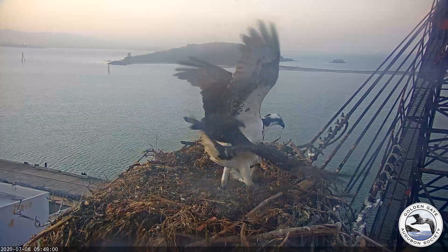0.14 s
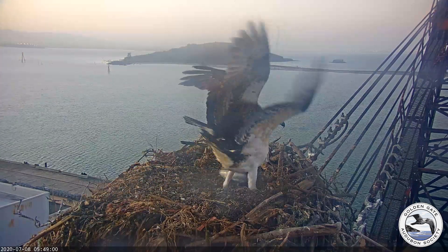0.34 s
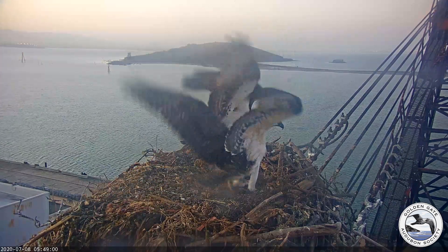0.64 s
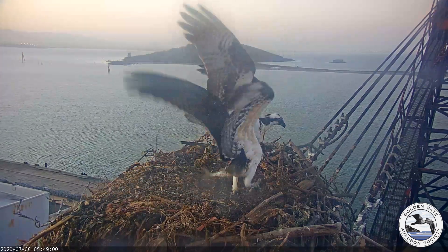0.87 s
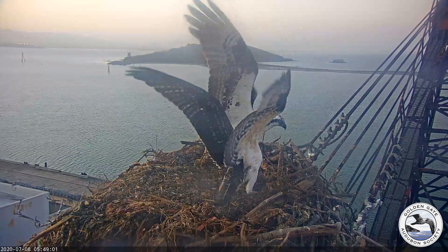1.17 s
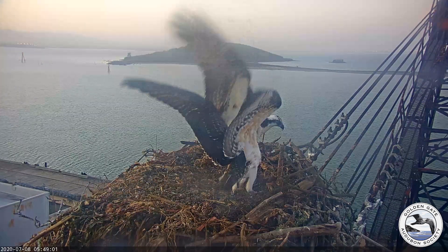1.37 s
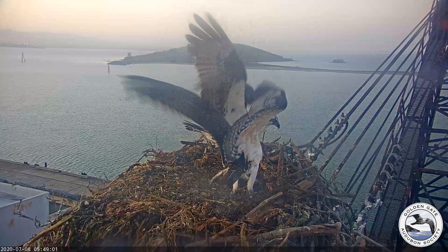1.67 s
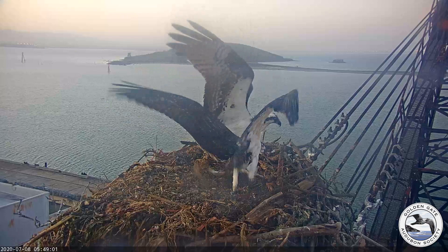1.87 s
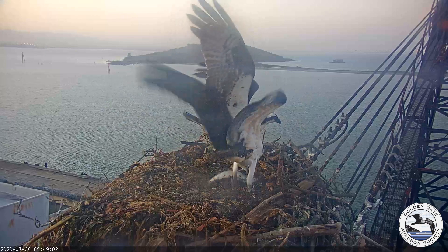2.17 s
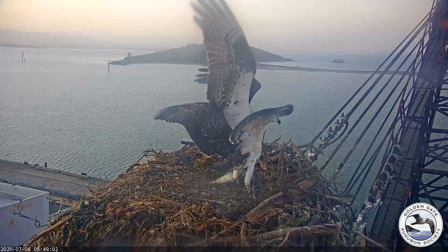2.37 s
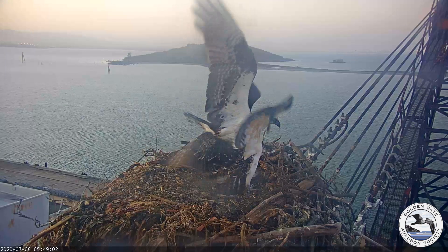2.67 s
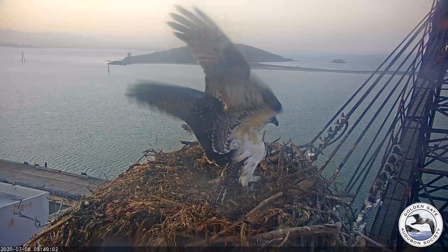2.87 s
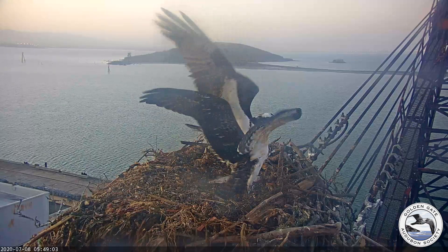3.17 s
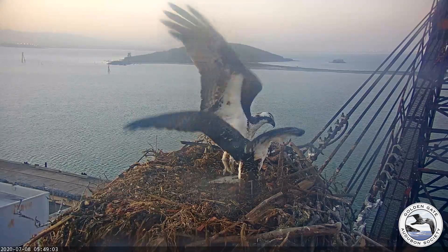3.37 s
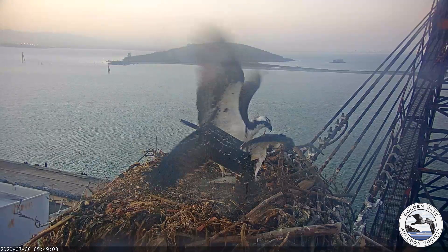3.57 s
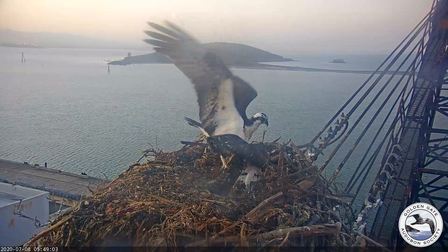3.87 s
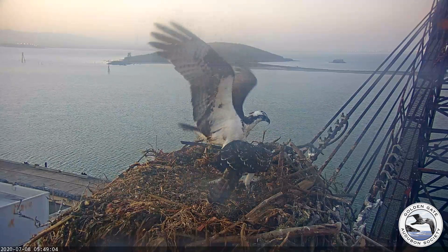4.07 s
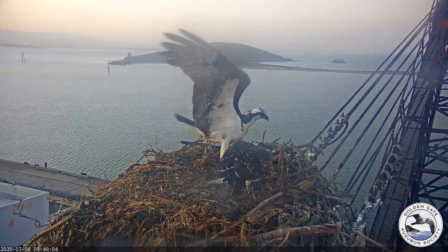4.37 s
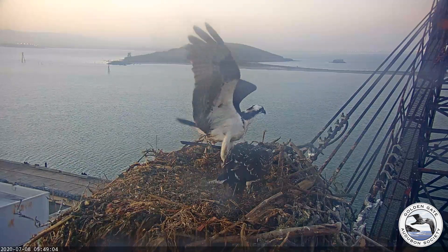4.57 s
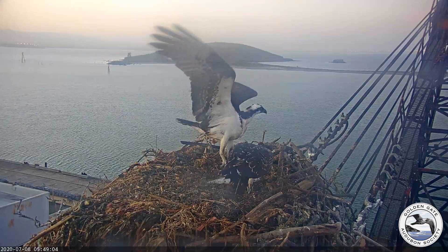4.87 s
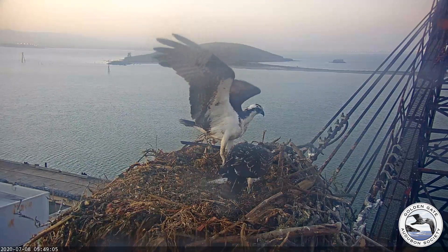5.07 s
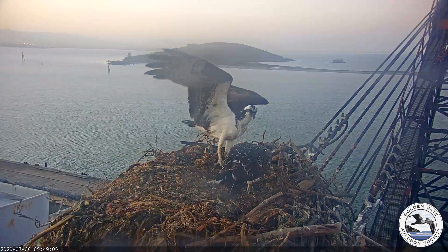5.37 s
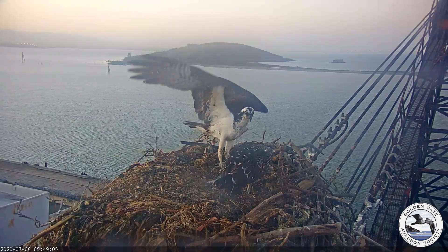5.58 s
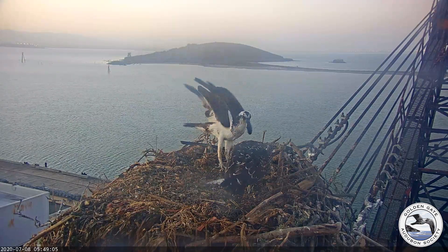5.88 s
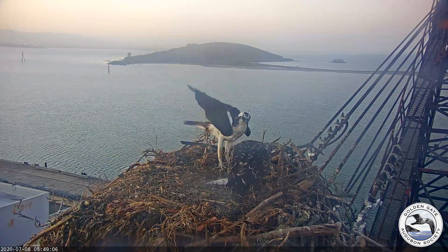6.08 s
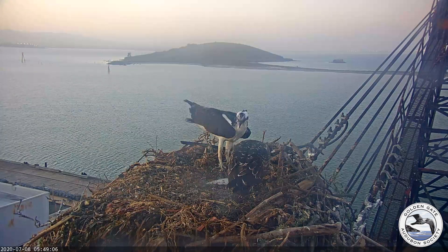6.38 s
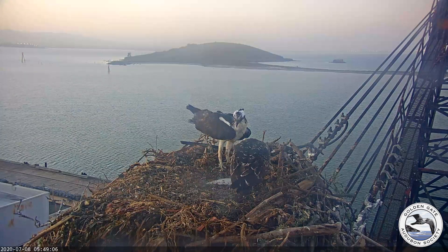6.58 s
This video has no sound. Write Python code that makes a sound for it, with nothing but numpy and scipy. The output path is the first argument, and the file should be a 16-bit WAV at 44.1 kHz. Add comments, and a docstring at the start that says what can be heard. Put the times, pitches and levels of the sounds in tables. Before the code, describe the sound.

Outdoors by the water, large birds call over a low, steady wash. First come separate piercing whistles, some drooping at the end, with brief voice cracks between them. They stop for about a second, then loud chirps rattle out about six per second, each rising, breaking higher and dropping back. Distant gulls cry very faintly. Close, slightly overloaded sound with quick light reflections and a thin tail.

```python
"""Shore wash runs throughout; ospreys on a nest begin with squeaks, faint scoops and drawn-out begging whistles.
Far gulls, plain pitch arches, cry from 0.4 s. From 3.3 s a fast run of chirps joins the last whistles:
each climbs on the low side of the syrinx, breaks to the high side and drops back; a last squeak follows.
Voices are trembling near sines with air noise and reflections. The microphone clips loud notes unevenly,
which adds their octave and low difference tones."""
import sys
import numpy as np
from scipy import signal
from scipy.fft import rfft, irfft, next_fast_len
from scipy.io import wavfile
from scipy.ndimage import uniform_filter1d, map_coordinates

SR = 44100
rng = np.random.default_rng(int(sys.argv[2]) if len(sys.argv) > 2 else 0)


def waveform_to_disk(signal):
    """Save audio, clipped to [-1, 1], as 16-bit WAV at the path in sys.argv[1]."""
    frames = np.transpose(np.atleast_2d(signal))
    scaled = np.clip(frames, -1, 1) * 32767
    samples = np.round(scaled).astype(np.int16)
    wavfile.write(sys.argv[1], SR, samples)


N = 296793


def from_db(db):
    """Decibels to gain."""
    return 10 ** (np.asarray(db) / 20)


def unit(x):
    """Scales to rms 1."""
    return x / np.sqrt(np.mean(x ** 2) + 1e-20)


def colour(x, points):
    """Filters by a spectrum of (Hz, dB) points, interpolated over log frequency."""
    hz, db = np.transpose(points)
    size = next_fast_len(len(x) + 4096)
    f = np.fft.rfftfreq(size, 1 / SR)
    gain = from_db(np.interp(np.log(f + 1), np.log(hz), db))
    return irfft(rfft(x, size) * gain, size)[:len(x)]


def waver(count, rate_hz):
    """Smooth random motion of about rms 1, up to about rate_hz."""
    at = np.arange(count) * 2 * rate_hz / SR
    knots = rng.standard_normal(int(at[-1]) + 4)
    return map_coordinates(knots, [at + 1], order=3, mode="nearest")


def add(mix, s, sound):
    """Mixes a sound in at time s."""
    part = mix[max(round(s * SR), 0):][:len(sound)]
    part += sound[:len(part)]


def parabola(u, first, middle, last):
    """A smooth arch through three values as u goes from 0 to 1."""
    return np.polyval(np.polyfit([0, .5, 1], [first, middle, last], 2), u)


def clock(length_s):
    """Time since the start of a note, and the same as a share of its length."""
    t = np.arange(max(round(length_s * SR), 64)) / SR
    return t, t / t[-1]


# shore wash and microphone hiss, spectrum shape: (frequency [Hz], relative density [dB])
WASH_SPECTRUM = [(30, -8), (750, -7.5), (1020, 4.5), (1300, -8.5), (1750, -21.5), (2500, 1.5),
                 (4200, -20.5), (5500, -30), (7000, -37)]
WASH_DB = -52.5


def wash():
    """Steady far noise of the shore, swelling slightly."""
    level_db = WASH_DB + 0.66 * waver(N, 1.0)
    return from_db(level_db) * unit(colour(rng.standard_normal(N), WASH_SPECTRUM))


# octave strength, lifted by the throat near 4 kHz: (octave frequency [Hz], level re fundamental [dB])
THROAT_OCTAVE = [(2400, -33.5), (3900, 2.5), (4500, -22), (5200, -30), (6500, -37), (7200, -48)]


def syrinx(hz, db, jitter, jitter_hz, shimmer_db, rasp):
    """One vibrating membrane: a trembling near sine, hoarse when pushed above 3200 Hz."""
    count = len(hz)
    strain = np.clip((hz - 3200) / 350, 0, 1)
    tremble = jitter * waver(count, jitter_hz) + rasp * strain * waver(count, 590)
    phase = 2 * np.pi * np.cumsum(hz * (1 + tremble)) / SR
    octave = from_db(np.interp(2 * hz, *np.transpose(THROAT_OCTAVE)))
    shimmer = shimmer_db * (1 + strain) * waver(count, 130)  # doubles at full strain
    return from_db(db + shimmer) * (np.sin(phase) + octave * np.sin(2 * phase))


def arches(rows, jitter, shimmer_db, rasp, taper, swell_s):
    """Short notes, each one arch of pitch, that swell as the air pressure builds."""
    out = np.zeros(N)
    for start, length, first_hz, middle_hz, last_hz, db in rows:
        t, u = clock(length)
        pitch = parabola(u, first_hz, middle_hz, last_hz)
        tone = syrinx(pitch, db, jitter, 219.7, shimmer_db, rasp)
        add(out, start, tone * np.minimum(t / swell_s, 1) * np.sin(np.pi * u) ** taper)
    return out


# voice squeaks and cracks:
# (start [s], length [s], start pitch [Hz], middle pitch [Hz], end pitch [Hz], level [dB])
SQUEAK_NOTES = [(.002, 0.059, 2960, 2700, 2520, -32), (0.337, 0.067, 2256, 2323, 2420, -31.5),
                (0.913, 0.071, 2396, 2208, 2080, -32.5), (0.918, 0.054, 2770, 2906, 2820, -28),
                (0.963, 0.081, 4220, 3540, 3030, -36.5), (1.042, 0.081, 3130, 3540, 3660, -35.5),
                (1.557, 0.057, 3960, 3670, 3673, -29.5), (1.598, 0.021, 2970, 2805, 2560, -24),
                (1.717, .082, 2590, 3783, 3570, -25), (1.789, .05, 3660, 3634, 3444, -35),
                (1.838, 0.029, 2930, 2786, 2530, -20), (2.198, 0.045, 2560, 2860, 3546, -30),
                (2.398, 0.063, 2230, 2150, 2030, -36.5), (2.758, 0.027, 2690, 2354, 2280, -35),
                (3.32, 0.022, 5020, 4430, 3350, -51), (3.9, 0.031, 2990, 2915, 2500, -26),
                (6.445, 0.047, 2247, 2410, 2304, -24.5)]


def squeaks():
    """Squeaks and cracks of the voice: brief pitch arches with abrupt ends."""
    return arches(SQUEAK_NOTES, jitter=0.0037, shimmer_db=1.62, rasp=0.019, taper=0.32, swell_s=0.0018)


# air rushing through the open beak, spectrum shape: (frequency [Hz], relative density [dB])
BEAK_AIR = [(1600, -26.5), (2300, 3.5), (3100, 2.5), (3900, 1.5), (4700, -16), (6700, -18.5), (7500, -43.5)]


def rush(voice, db, follow):
    """Fluttering air noise that grows with the strength of the voice."""
    strength = np.sqrt(abs(uniform_filter1d(voice ** 2, size=200))) + 1e-12
    flutter = from_db(2.5 * waver(N, 160))
    air = unit(colour(flutter * rng.standard_normal(N), BEAK_AIR))
    return from_db(db) * strength ** follow * air


SCOOP_LEAD_S, SCOOP_S, REST_S = 0.019, 0.03, .03


def scoops(db):
    """Faint, airy upward scoops as the syrinx starts to sound after a rest."""
    calls = [(row[0], row[1]) for row in WHISTLE_NOTES + SQUEAK_NOTES]
    calls += [(row[0], sum(row[1:5])) for row in CHIRP_NOTES]
    rising = []
    for start, *_ in WHISTLE_NOTES + CHIRP_NOTES:
        if not any(s < start < s + length + REST_S for s, length in calls):
            rising.append((start - SCOOP_LEAD_S, SCOOP_S, 1820, 2020, 2200, db))
    # the swell outlasts the scoop, so full level is never reached
    return arches(rising, jitter=0.031, shimmer_db=3.0, rasp=0, taper=1.0, swell_s=0.044)


SLIDE_SHARE, SETTLE_S, SWING_HZ = .05, .03, 12  # pitch slides up by this share, overshoots, settles
DROOP_S, LIFT_HZ = .02, 14  # closing pitch lifts briefly, then sinks with the level
ATTACK_S = .008
# begging whistles, pitches before slide and droop, levels before droop:
# (start [s], length [s], first, middle, last pitch [Hz], first, middle, last level [dB],
#  closing droop [share of pitch])
WHISTLE_NOTES = [(.19, 0.15, 2984, 2992, 2950, -34.5, -28.5, -25.5, 0.013),
                 (0.381, 0.083, 3300, 3008, 2810, -25.5, -20, -18.5, 0.057),
                 (0.577, 0.24, 3180, 2950, 3052, -24.5, -20.5, -20.5, 0.16),
                 (1.056, .11, 2740, 2960, 2680, -43.5, -25, -27.5, 0),
                 (1.314, 0.24, 2917, 2982, 3031, -20, -21, -14, 0),
                 (1.778, 0.074, 3230, 3067, 3104, -16.5, -32, -20, 0.022),
                 (1.97, 0.13, 2983, 2957, 2684, -20, -22, -23, 0.051),
                 (2.24, 0.12, 2790, 3005, 3014, -31.5, -25.5, -28.5, 0.1),
                 (3.4, .15, 2500, 2505, 2650, -40, -39.5, -34.5, 0.022),
                 (3.553, 0.093, 2774, 2610, 2550, -26, -30, -34.5, 0),
                 (3.72, .153, 2930, 2972, 2881, -21, -18, -22, 0),
                 (4.227, 0.091, 3040, 2786, 2795, -25, -25.5, -39, 0.02),
                 (4.396, 0.073, 3000, 3020, 3180, -18, -21, -29.5, 0),
                 (4.473, 0.04, 3306, 3115, 3065, -20.5, -24, -20, 0.012),
                 (4.57, 0.042, 2860, 2650, 2650, -22, -27, -36.5, 0)]


def whistles():
    """Long, nearly level begging whistles that slide in, swell or fade; most droop at the end."""
    out = np.zeros(N)
    for start, length, first_hz, middle_hz, last_hz, first_db, middle_db, last_db, droop in WHISTLE_NOTES:
        t, u = clock(length)
        slide = SLIDE_SHARE * np.exp(-t / SETTLE_S) * np.cos(2 * np.pi * SWING_HZ * t)
        closing = np.exp((t - t[-1]) / DROOP_S)
        sink = closing * np.cos(2 * np.pi * LIFT_HZ * (t - t[-1]))
        bend = 1 - slide - droop * sink + 0.0027 * waver(len(t), 14)
        pitch = parabola(u, first_hz, middle_hz, last_hz) * bend
        db = parabola(u, first_db, middle_db, last_db) - 110 * droop * closing ** 3
        tone = syrinx(pitch, db, jitter=0.0087, jitter_hz=460, shimmer_db=0.44, rasp=.02)
        fade = signal.windows.tukey(len(t), .009 * SR / len(t))
        add(out, start, tone * fade * np.minimum(t / ATTACK_S, 1))
    return out


# far gull cries:
# (start [s], length [s], start pitch [Hz], middle pitch [Hz], end pitch [Hz], level [dB])
GULL_CRIES = [(.4, 0.24, 960, 1001, 880, -52.5), (1.6, 0.15, 830, 880, 1060, -51),
              (1.73, .13, 840, 821, 760, -50), (1.82, 0.084, 1058, 1050, 940, -49.5),
              (2.85, .3, 880, 880, 834, -54), (4.72, 0.12, 800, 866, 877, -54.5)]


def gulls():
    """Far gull cries: low, trembling pitch arches."""
    return arches(GULL_CRIES, jitter=0.017, shimmer_db=4, rasp=0, taper=0.3, swell_s=0.0075)


def note(hz, db):
    """One note of a chirp on a given pitch curve, with rounded ends."""
    rounded = np.sin(np.linspace(0, np.pi, len(hz))) ** 0.49
    return syrinx(hz, db, jitter=0.0085, jitter_hz=220.5, shimmer_db=3.4, rasp=0.021) * rounded


OVERLAP_S, LINGER_S = .003, .008  # overrun into the next note; the high note lingers longer
LEAD_HZ_PER_S, LEAD_SWELL_S = 3600, 0.0094


def lead_note(length, hz, db):
    """A chirp opens on the low side of the syrinx, climbing gently as the air pressure builds."""
    t, _ = clock(length + OVERLAP_S)
    return note(hz + LEAD_HZ_PER_S * (t - t.mean()), db) * np.minimum(t / LEAD_SWELL_S, 1)


CREST_S, CREST_HZ = .015, 410  # this much lower this long before and after the middle


def crest_note(length, hz, db):
    """The low side arches up and dips just before the voice breaks."""
    t, _ = clock(length + OVERLAP_S)
    return note(hz - CREST_HZ * ((t - t.mean()) / CREST_S) ** 2, db)


PEAK_S, BEND_S, BEND_HZ = .009, .03, 312  # early peak, then down this far in BEND_S


def high_note(length, hz, db):
    """The high side takes over at the break, peaks and bends down."""
    t, _ = clock(length + LINGER_S)
    return note(hz - BEND_HZ * ((t - PEAK_S) / BEND_S) ** 2, db)


DROP_HZ_PER_S = 11500


def drop_note(length, last_hz, db):
    """The voice falls back to the low side and slides down as the chirp closes."""
    t, _ = clock(length + OVERLAP_S)
    return note(last_hz + DROP_HZ_PER_S * (t[-1] - t), db)


# closing pitch, sinking as the run goes on: (time [s], pitch [Hz])
CLOSING_PITCH = [(3.35, 2554), (4.7, 2519), (5.0, 2210), (6.25, 2200)]
# chirps: (start [s], lead, crest, high, drop length [s], lead, crest, high pitch [Hz],
#  lead, crest, high, drop level [dB])
CHIRP_NOTES = [(3.337, 0.0073, .008, .02, 0.022, 3005, 2793, 3380, -14, -19.5, -26, -20),
               (3.482, 0.0093, .008, .015, 0.043, 2950, 3180, 3310, -14.5, -28.5, -25.5, -14),
               (3.643, 0.02, 0.004, 0.019, 0.036, 2620, 2840, 3025, -20, -24.5, -18.5, -13.5),
               (3.808, 0.04, 0.013, .014, 0.016, 2670, 3187, 3456, -29, -16, -18, -16.5),
               (3.98, 0.036, .011, 0.016, 0.018, 2900, 3120, 3422, -15, -16, -15, -14),
               (4.151, 0.023, 0.0099, 0.034, 0.013, 2700, 2810, 2999, -21.5, -19.5, -2.5, -18),
               (4.32, 0.012, .026, .024, 0.016, 2623, 2966, 3395, -16.5, -14, -11.5, -15.5),
               (4.487, .028, .015, 0.024, .014, 2656, 3047, 3433, -16.5, -12.5, -18, -13.5),
               (4.65, 0.045, 0.0061, 0.025, 0.0074, 2840, 3110, 3286, -8.5, -13, -17, -21.5),
               (4.814, 0.033, .014, .028, 0.0074, 2620, 2923, 3220, -8.5, -16.5, -16, -30.5),
               (4.978, 0.031, .017, 0.034, 0.01, 2548, 2827, 3192, -13.5, -16, -15, -28.5),
               (5.148, 0.021, .027, 0.037, 0.0043, 2420, 2743, 3115, -22, -12.5, -14, -36.5),
               (5.319, .022, .026, 0.036, 0.0064, 2360, 2780, 3125, -23.5, -14.5, -15, -26),
               (5.496, 0.021, 0.027, 0.04, 0.0055, 2390, 2918, 3157, -23.5, -12, -16.5, -37.5),
               (5.675, 0.017, .025, 0.036, 0.0053, 2379, 2887, 3076, -22, -9.5, -12.5, -36),
               (5.848, .02, 0.023, .036, .007, 2290, 2708, 3113, -24, -16, -13, -36.5),
               (6.026, 0.019, 0.027, 0.034, 0.0062, 2323, 2786, 3047, -25.5, -9, -14, -38.5),
               (6.213, .026, 0.007, 0.03, 0.0056, 2603, 2770, 3045, -11, -11.5, -14.5, -24)]


def chirps():
    """Every chirp is the same gesture: a lead, a crest, a break to the high note, a closing drop."""
    out = np.zeros(N)
    for start, *settings in CHIRP_NOTES:
        lead_s, crest_s, high_s, drop_s = settings[:4]
        lead_hz, crest_hz, high_hz = settings[4:7]
        lead_db, crest_db, high_db, drop_db = settings[7:]
        break_at = start + lead_s + crest_s
        last_hz = np.interp(start, *np.transpose(CLOSING_PITCH))
        add(out, start, lead_note(lead_s, lead_hz, lead_db))
        add(out, start + lead_s, crest_note(crest_s, crest_hz, crest_db))
        add(out, break_at, high_note(high_s, high_hz, high_db))
        add(out, break_at + high_s, drop_note(drop_s, last_hz, drop_db))
    return out


def rasps(db, length_s):
    """A short burst of turbulent noise at each break of the voice."""
    gate = np.zeros(N)
    for start, lead_s, crest_s, *_ in CHIRP_NOTES:
        add(gate, start + lead_s + crest_s - .005, np.hanning(round(length_s * SR)))
    return from_db(db) * gate * unit(colour(rng.standard_normal(N), BEAK_AIR))


def bounce(x, delay_s, db):
    """One close inverted reflection, which dents each glide as it passes certain pitches."""
    t = np.arange(N) / SR
    return x - from_db(db) * np.interp(t - delay_s, t, x)


def surroundings(x, near_db, far_db, t60):
    """Quick reflections off the nest and the steelwork, then a thin tail from farther structures."""
    t = np.arange(SR) / SR
    taps = rng.choice([-1., 1.], SR) * (rng.random(SR) < 2000 / SR)  # about 2000 per second
    near = taps * (t > .002) * from_db(-60 * t / .08)
    far = taps * np.clip((t - .02) / 0.013, 0, 1) * from_db(-60 * t / t60)
    response = from_db(near_db) * near / np.linalg.norm(near)
    response += from_db(far_db) * far / np.linalg.norm(far)
    return x + signal.fftconvolve(x, response)[:N]


def scene():
    """The birds at the nest with their reflections, the gulls and the wash."""
    begging = squeaks() + whistles()
    begging += rush(begging, db=-36, follow=0.44)
    onsets = scoops(db=-39)
    onsets += rush(onsets, db=-11.5, follow=0.83)
    run = chirps()
    chirping = bounce(run, delay_s=0.002078, db=-17.5)
    chirping += rush(run, db=-34, follow=0.79) + rasps(db=-37.5, length_s=0.032)
    birds = surroundings(begging + onsets + chirping, near_db=-18.0, far_db=-25.5, t60=1.0)
    return (birds + gulls() + wash())[None]


# colour of the overload products: (frequency [Hz], gain [dB])
OVERLOAD_COLOUR = [(30, -38.5), (200, -11), (500, -4.5), (1700, -9.5), (2400, -0.5), (6500, 0), (7500, -24)]
BAND_LIMIT_HZ = 7750


def record(dry):
    """The microphone flattens loud notes, negative swings much sooner than positive; then the band limit."""
    fine = signal.resample_poly(dry[0], 4, 1)  # oversampled against aliasing
    flattened = np.clip(fine, -from_db(-22.5), from_db(-12.0))
    products = signal.resample_poly(flattened - fine, 1, 4)[:N]
    loaded = dry[0] + colour(products, OVERLOAD_COLOUR)
    lowpass = signal.firwin(255, BAND_LIMIT_HZ, window=("kaiser", 8), fs=SR)
    return signal.oaconvolve(loaded, lowpass, "same")[None]


dry = scene()
out = record(dry)
waveform_to_disk(out)
```